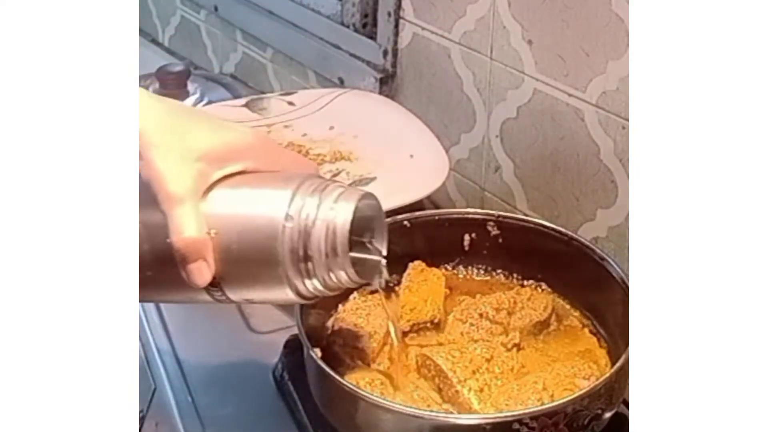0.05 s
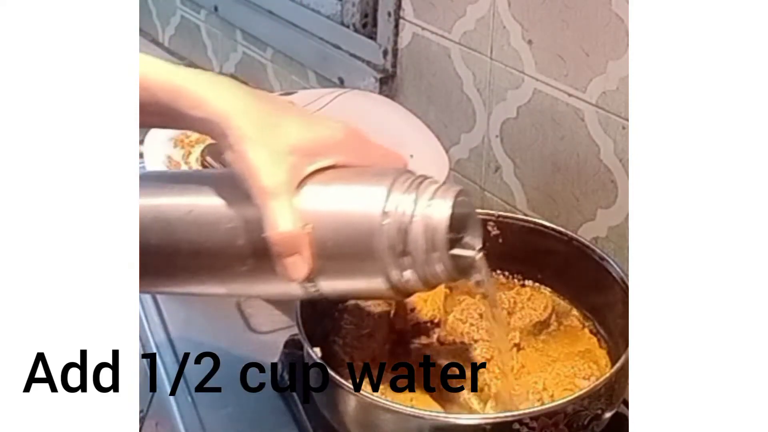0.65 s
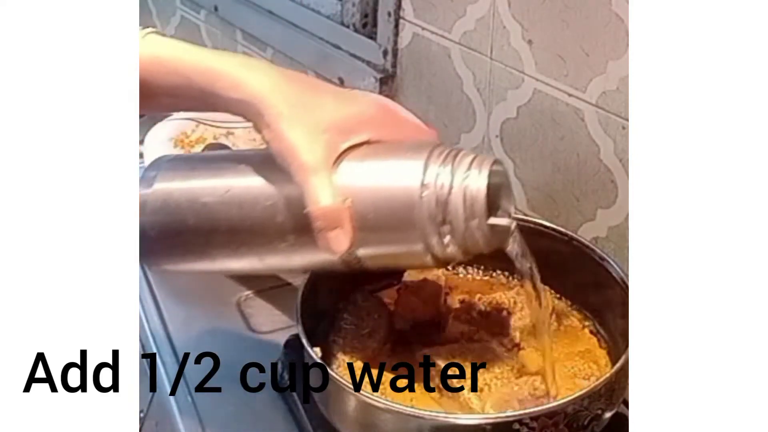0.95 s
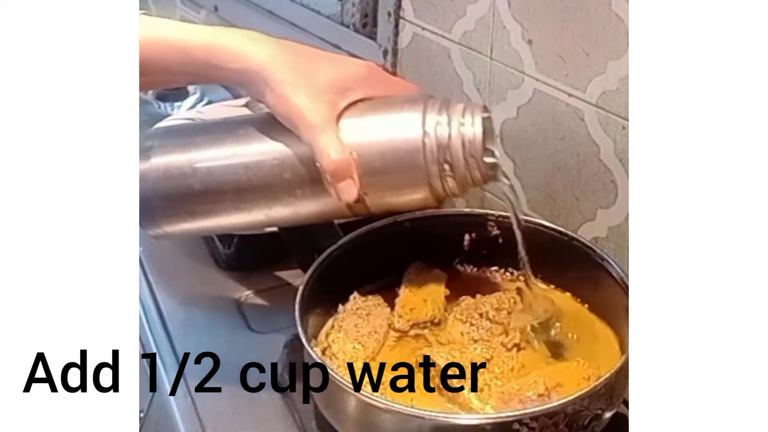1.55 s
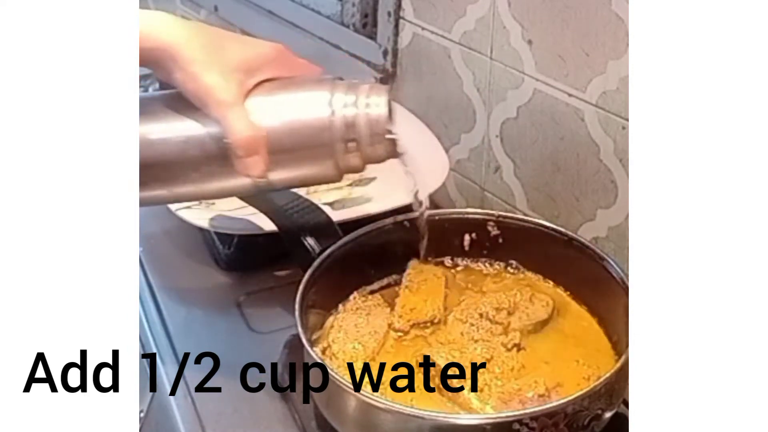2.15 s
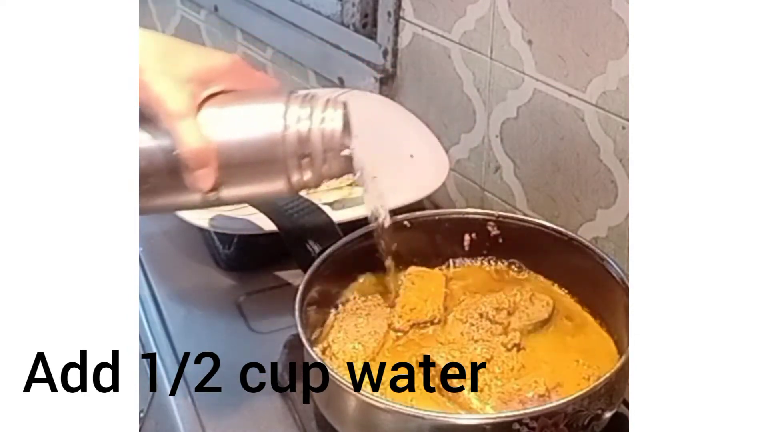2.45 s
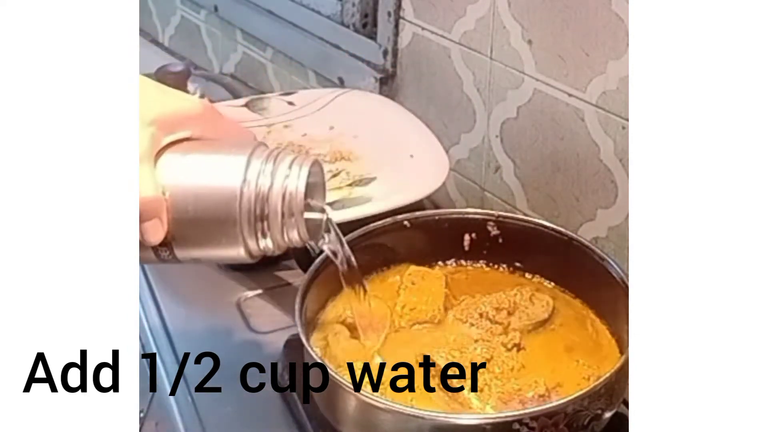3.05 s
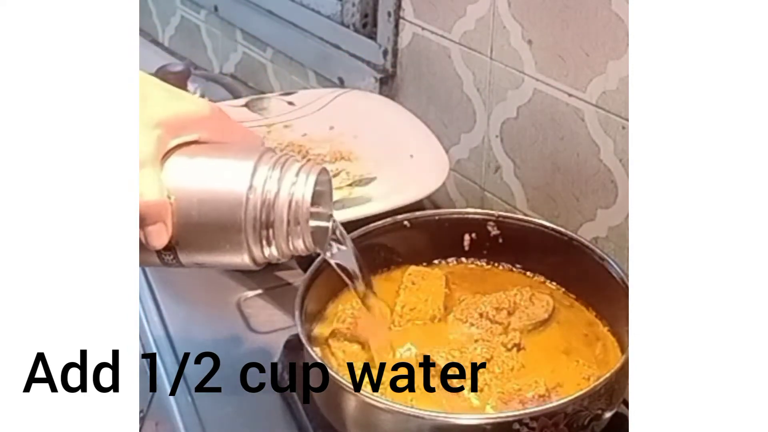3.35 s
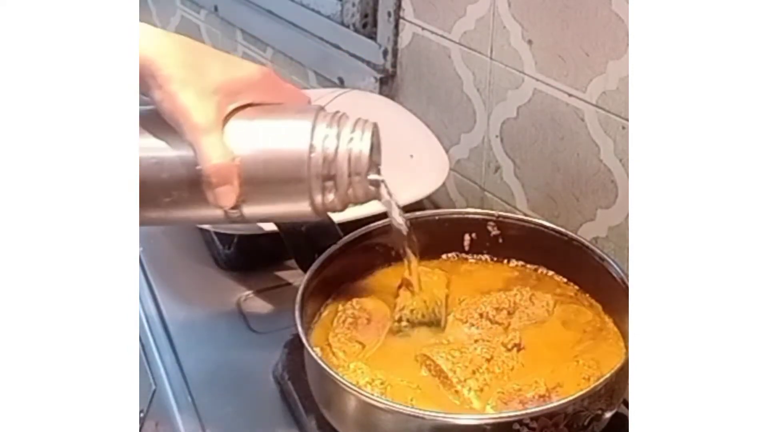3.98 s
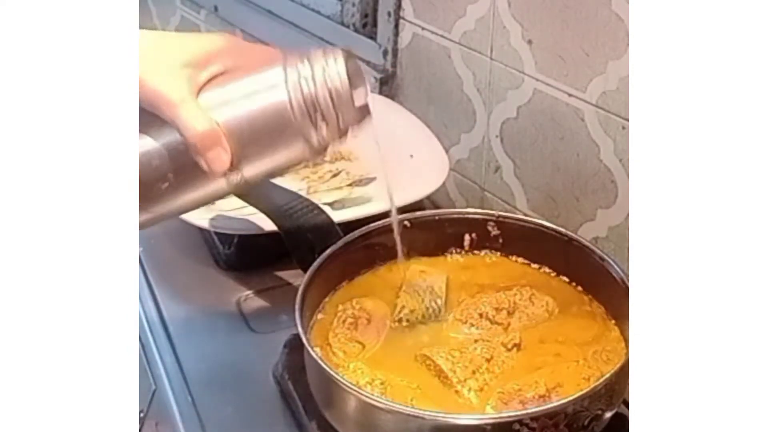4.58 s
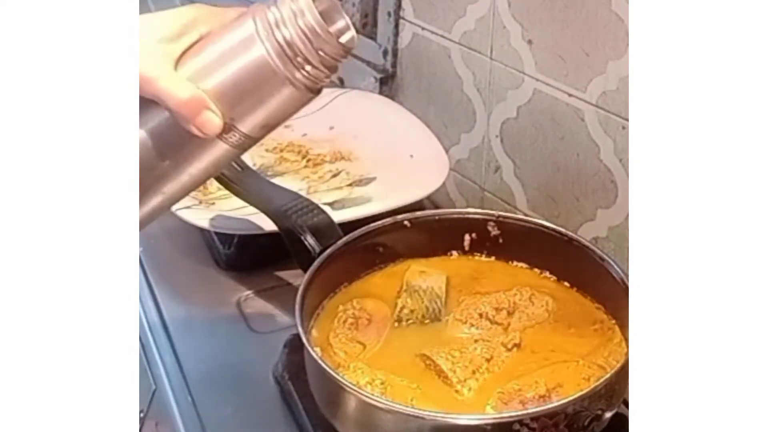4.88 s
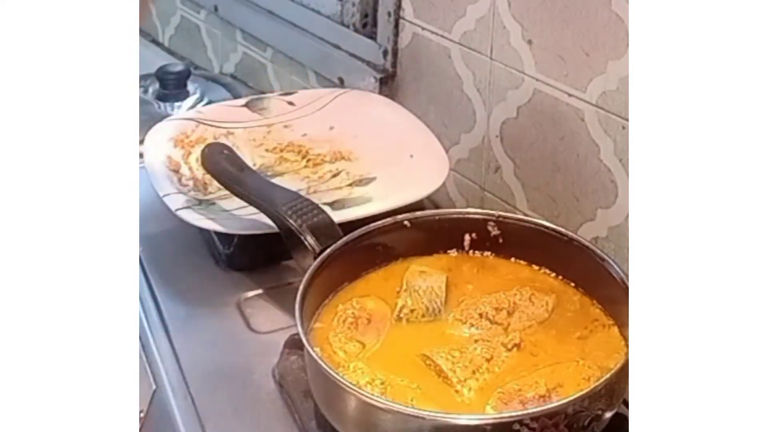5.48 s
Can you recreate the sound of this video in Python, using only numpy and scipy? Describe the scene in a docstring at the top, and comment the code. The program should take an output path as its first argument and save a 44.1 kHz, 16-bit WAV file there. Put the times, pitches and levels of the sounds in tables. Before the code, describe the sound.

Fish fries in a pan with a dense sizzle and sharp spits of fat. Water is poured in, and the sizzle thins to a light crackle with brief flares while the stream splashes, gurgles and plips. As the pouring stops, a steel flask gives one low clunk with a metallic ring. The pan sounds close and slightly to the right, in a small reverberant kitchen with a faint appliance hum.

```python
"""A dense sizzle is heard first: steam bubbles burst around fish frying in oil and spice paste; fat spits.
Water poured from a steel flask cools the pan, so the crackle thins, flaring where a spot is still hot.
The stream splashes and traps air, which rings as bubbles. Tipped upright, the flask clunks:
a short low boom that lingers in the room, with a steel ring above it.
A small tiled kitchen reverberates, over the low hum of an appliance."""
import sys
import numpy as np
from scipy import signal
from scipy.fft import rfft, irfft, next_fast_len
from scipy.io import wavfile

SR = 44100
rng = np.random.default_rng(int(sys.argv[2]) if len(sys.argv) > 2 else 0)


def generate_wav(signal):
    """Clip the signal to [-1, 1] and save it as 16-bit WAV at the path in sys.argv[1]."""
    frames = np.transpose(np.atleast_2d(signal))
    scaled = np.clip(frames, -1, 1) * 32767
    pcm = np.round(scaled).astype(np.int16)
    wavfile.write(sys.argv[1], SR, pcm)


N = 247842

# Event levels are those of the source, before colouring, room and microphone.
# water reaching spots that are still hot: (t/s, length/s, level/dB)
FLARES = [(0.0, 0.27, -53.5), (0.85, 0.23, -51), (2.32, 0.2, -61.5), (3.04, 0.043, -55.5),
          (3.46, 0.25, -58.5), (3.82, 0.17, -58), (4.13, 0.28, -55.5), (4.59, 0.035, -56)]
# spectrum of the froth in hot oil: (f/Hz, level/dB)
FROTH_SPECTRUM = [(300, -39.5), (600, -12.5), (740, 3), (1200, -2.5), (2000, 8), (4500, -3.5), (7500, -0.5),
                  (15000, -1.5)]
# resonances of the pan: (f/Hz, bandwidth/Hz, level/dB relative to the crackle)
PAN_MODES = [(737, 13, 3.5), (903, 25, 0.5), (1166, 83, 5), (1830, 32, -11), (3680, 34, -2.5),
             (4030, 24, -3.5)]
# spectrum of the fine spray: (f/Hz, level/dB)
SPRAY_SPECTRUM = [(5500, -22.5), (8500, -5), (15000, -6)]
# the stream breaking up on the fish into spray: (t/s, length/s, level/dB)
SPLASHES = [(1.38, 0.05, -54), (1.68, 0.25, -53.5), (2.93, 0.11, -58.5), (3.35, 0.074, -59),
            (3.57, 0.597, -54.5), (4.22, 0.19, -56), (4.57, 0.033, -53.5)]
# spectrum of the kitchen air: (f/Hz, level/dB)
AIR_SPECTRUM = [(15, 5.5), (35, -65), (55, -5), (90, -2), (160, -3.5), (300, -11.5), (900, -11),
                (2400, -12.5), (5000, -21), (15000, -22)]
# left-right coherence of that air: (f/Hz, coherence 0-1)
AIR_COHERENCE = [(60, 1), (140, 0.98), (300, 0.71), (700, 0.64), (3000, 0)]
# steady tones: the appliance hum, and at 736 Hz the pan's lowest mode ringing on: (f/Hz, relative level/dB)
HUM_TONES = [(77.5, -11), (148, -9), (296, -9.5), (736, -7)]
# spitting fat: (t/s, level/dB, f/Hz)
SPITS = [(0.126, -27.5, 5450), (0.198, -27, 7100), (0.4347, -26.5, 5150), (0.606, -29.5, 5000),
         (0.629, -32, 4700), (0.857, -30, 6260), (1.0173, -34, 5550), (1.038, -30, 5200),
         (1.063, -32, 4230), (1.0807, -30.5, 5130), (1.331, -37, 4840), (1.429, -35.5, 4740),
         (1.475, -26, 3450), (1.5739, -28.5, 3550), (1.9982, -32.5, 4770), (2.128, -34.5, 3700),
         (2.329, -41.5, 5100), (2.373, -41, 4100), (3.09, -32.5, 4980), (3.5384, -24, 5300),
         (3.9087, -27, 3270), (4.1953, -37.5, 5100), (4.302, -32, 4960), (4.362, -36.5, 5000),
         (4.4665, -43, 5100), (4.981, -42, 5400)]
# thin, bright snaps of spray: (t/s, level/dB)
SNAPS = [(2.8304, -40.5), (3.219, -35), (3.6593, -32), (4.061, -39)]
# loud plips of air bubbles in the poured water: (t/s, level/dB, f/Hz)
PLIPS = [(0.701, -26, 3600), (2.445, -39, 2640), (2.4605, -39, 2430), (2.5026, -38.5, 2770),
         (2.513, -41, 1840), (2.634, -40, 1970), (2.728, -42, 3090), (2.9302, -41.5, 2700),
         (3.0104, -45, 1690), (3.3543, -38, 2930), (3.368, -38, 2790), (3.542, -28, 5070),
         (3.6113, -34.5, 2400), (4.194, -41, 1940), (4.302, -28.5, 4190), (4.387, -36, 1780)]
# gushes from the flask's neck: (t/s, length/s, level/dB, bubble f/Hz)
GUSHES = [(2.184, 0.11, -59, 2310), (2.452, 0.084, -53, 2180), (2.57, 0.16, -62.5, 2590),
          (3.01, 0.085, -60, 2280), (3.258, 0.057, -59.5, 2200), (3.332, 0.19, -59.5, 2840),
          (3.548, 0.24, -55, 2300), (3.854, 0.12, -57.5, 2710), (4.19, 0.2, -55.5, 2304)]
# spectrum of the bubbling gravy: (f/Hz, level/dB)
BUBBLE_SPECTRUM = [(500, -32), (1200, 10.5), (1900, 6), (3000, 12), (5000, 7), (8000, -19)]
# the flask's low boom, the room modes it excites and the steel ring: (f/Hz, relative level/dB, T60/s)
CLUNK_MODES = [(479.4, 17, 0.054), (437, 3.5, 0.34), (458, -3, 0.4), (500, -8, 0.53), (515.6, 2, 0.4),
               (559, -3.5, 0.3), (1588, -17, 0.48), (2454, -12, 0.33), (2850, -18.5, 0.44),
               (4150, -8, 0.12), (5270, 0, 0.092), (5220, -11.5, 0.48)]
# lean of the clunk to the right: (f/Hz, right minus left level/dB)
FLASK_LEAN = [(440, -4), (520, 3.5), (2400, -0.5)]
# reverberation time of the kitchen: (f/Hz, T60/s)
KITCHEN_T60 = [(200, 0.068), (500, 0.77), (2500, 0.29), (5500, 0.41), (14000, 0.11)]
# response of the microphones: (f/Hz, level/dB)
MIC_RESPONSE = [(700, 0.5), (1100, 1), (1320, -3), (1800, 2), (2100, 0), (2600, 4.5), (3500, -2),
                (5080, 5.5), (6600, -0.5), (9700, -13), (11500, -8.5), (15500, -6.5)]
# imbalance of the microphones: (f/Hz, left minus right level/dB)
MIC_BALANCE = [(1200, -0.5), (2400, -1), (4500, -6), (8500, -2.5), (15000, 1.5)]

LEFT_LAG_S = 0.00041  # the pan's sound reaches the left microphone later


def amp(db):
    """Decibels to amplitude ratio."""
    return 10 ** (np.asarray(db) / 20)


def unit(x):
    """Normalisation to rms 1."""
    return x / np.sqrt(np.mean(x ** 2) + 1e-20)


def along(points, hz):
    """Interpolation of (f/Hz, value) points on a logarithmic frequency axis."""
    f, v = np.transpose(points)
    return np.interp(np.log(hz + 1), np.log(f + 1), v)


def since(s):
    """Time elapsed since s, zero before it."""
    return np.maximum(np.arange(N) / SR - s, 0)


def flutter(rate):
    """Random modulation: straight lines through Gaussian knots, rate knots a second."""
    knots = rng.standard_normal(2048)
    return np.interp(np.arange(N) * (rate / SR), np.arange(len(knots)), knots)


def surges(rows, attack_s=0.0046, release_s=0.064):
    """Incoherent sources add in power: the joint envelope of (t/s, length/s, level/dB) events."""
    shape = lambda s, length: np.minimum(since(s) / attack_s, 1) * np.exp(-since(s + length) / release_s)
    return np.sqrt(sum((amp(db) * shape(s, length)) ** 2 for s, length, db in rows))


def add(track, s, sound):
    """Superposition of a sound on a track at time s."""
    part = track[..., max(round(s * SR), 0):][..., :sound.shape[-1]]
    part += sound[..., :part.shape[-1]]


def filtered(x, response):
    """Linear filtering: the spectrum of x times a frequency response."""
    m = next_fast_len(N + SR // 2)
    return irfft(rfft(x, m) * response(np.fft.rfftfreq(m, 1 / SR)), m)[..., :N]


def coloured(x, spectrum, size=2048):
    """A minimum-phase filter is causal, so clicks keep their sharp fronts."""
    cepstrum = irfft(np.log(amp(along(spectrum, np.fft.rfftfreq(size, 1 / SR))) + 1e-6))
    cepstrum[1:size // 2] *= 2
    cepstrum[size // 2 + 1:] = 0
    kernel = irfft(np.exp(rfft(cepstrum)))
    return signal.fftconvolve(x, kernel[None], axes=1)[:, :N]


def swarm(rate, pitch_hz, scatter, cycles, spread_db, count, size):
    """Damped oscillators, few strong and many weak, start at random, rate a second; stereo, rms 1."""
    when, luck, weight, place = rng.random((count, 4)).T
    start = (when * N).astype(int)
    alive = luck < np.broadcast_to(rate, N)[start] * N / SR / count  # thin out the candidates
    start, weight, place = start[alive, None], weight[alive, None], place[alive, None]
    detune, life, lean = rng.standard_normal((count, 3))[alive].T[..., None]
    hz = np.clip(np.broadcast_to(pitch_hz, N)[start] * np.exp(scatter * detune), 200, SR / 3)
    turns = hz * np.arange(size) / SR
    age = turns / (cycles * np.exp(life / 2))
    strength = amp(spread_db * np.minimum(-np.log(weight + 1e-9), 3.5))
    ring = strength * np.exp(-age) * np.sin(2 * np.pi * turns)
    # each has its own place in the pan, so its own delay at the left microphone
    index = start + np.arange(size)
    lag = (place * 0.0002 * SR).astype(int)
    left = np.bincount((index + lag).ravel(), (ring * amp(2 * lean)).ravel(), N)[:N]
    right = np.bincount(index.ravel(), ring.ravel(), N)[:N]
    return unit(np.array([left, right]))


def kitchen(x, right_db, room_db, walls_db, walls_t60, lag_s=0):
    """Direct sound from the right, early reflections from pan rim and tiles, then reverberation."""
    hz, t, noise = signal.stft(rng.standard_normal((2, SR // 2)), SR, nperseg=256)
    tail = signal.istft(noise * amp(-60 * t / along(KITCHEN_T60, hz)[:, None]), SR, nperseg=256)[1]
    t = np.arange(tail.shape[1]) / SR
    tail *= 1 - np.exp(-t / 0.0013)
    walls = rng.standard_normal(tail.shape) ** 3 * amp(-60 * t / walls_t60) * (t > 0.001)
    norm = lambda h: h / np.linalg.norm(h, axis=1, keepdims=True)
    reflections = amp(room_db) * norm(tail) + amp(walls_db) * norm(walls)
    direct = np.array([np.pad(x[0], (round(lag_s * SR), 0))[:N], x[1]])
    direct *= amp([[-right_db / 2], [right_db / 2]])
    return direct + signal.fftconvolve(x, reflections, axes=1)[:, :N]


def pan_resonance(f):
    """Forced vibration: each mode of the pan adds a narrow band to the sound that drives it."""
    return 1 + sum(amp(db) * 1j * f * width / (hz * hz - f * f + 1j * f * width)
                   for hz, width, db in PAN_MODES)


def sizzle(pour_end_s, hot_db=-48, ticking_db=-67, quench_s=1.05, cooling_db_per_s=8):
    """Boiling: steam bubbles burst as a dense froth in hot oil, as separate ticks once water cools it."""
    oil = np.hypot(amp(hot_db - cooling_db_per_s * since(quench_s)), amp(ticking_db))
    strength = np.hypot(oil, surges(FLARES))
    rate = 90 + 1500 * (strength / amp(hot_db)) ** 1.2
    bursts = swarm(rate, pitch_hz=4900, scatter=0.23, cycles=2.6, spread_db=3.4, count=20000, size=160)
    froth = rng.standard_normal(N) + 1.8 * rng.standard_normal((2, N))
    froth *= amp(1.2 * rng.standard_normal(N))
    froth_share = np.interp(since(0), [1.2, 2.4], [0.7, 0.5]) * (oil / strength) ** 2
    crackle = np.sqrt(froth_share) * unit(coloured(froth, FROTH_SPECTRUM))
    crackle += np.sqrt(1 - froth_share) * unit(bursts / np.sqrt(rate))
    clumps = amp(2 * flutter(110))
    frying = strength * clumps * filtered(crackle, pan_resonance)
    # the hottest oil also cracks in sharp ticks
    thinning_db = 4 * since(0)
    ticks = swarm(220, pitch_hz=7000, scatter=0.2, cycles=1.8, spread_db=4, count=2000, size=96)
    frying += oil * amp(-6.5 - thinning_db) * ticks
    frying += spray(level_db=-51.5 - thinning_db - 21 * since(pour_end_s))
    return kitchen(frying, right_db=4, room_db=-7, walls_db=-5, walls_t60=0.025, lag_s=LEFT_LAG_S)


def spray(level_db):
    """Atomisation: the finest droplets fly off in spurts, louder where the stream breaks on the fish."""
    mist = swarm(1100, pitch_hz=11500, scatter=0.28, cycles=2.3, spread_db=2, count=10000, size=48)
    spurts = amp(3 * flutter(45))
    return np.hypot(amp(level_db), surges(SPLASHES)) * spurts * unit(coloured(mist, SPRAY_SPECTRUM))


def room_air():
    """A diffuse noise field is coherent between left and right in the bass, less so higher up."""
    angle = lambda hz: np.arccos(np.clip(along(AIR_COHERENCE, hz), -1, 1)) / 2
    shape = lambda hz: amp(along(AIR_SPECTRUM, hz)) * np.array([np.cos(angle(hz)), np.sin(angle(hz))])
    mid, side = filtered(rng.standard_normal((2, N)), shape)
    return amp(-55) * unit(np.array([mid + side, mid - side]))


def appliance_hum():
    """A line spectrum with random phase modulation; the lowest tone swells near the end."""
    lowest, *others = [amp(db) * np.sqrt(2) * np.sin(2 * np.pi * hz * since(0) + 1.94 * flutter(4.1))
                       for hz, db in HUM_TONES]
    swell = surges([(5.34, 0.3, -52.5)])
    return (amp(-60.5) + swell) * lowest + amp(-69.5) * sum(others)


def spitting():
    """Short impulses have broad spectra: fat spits with a crack, and spray snaps high above it."""
    spits, snaps = np.zeros((2, 2, N))
    t = np.arange(SR // 20) / SR
    for s, db, hz in SPITS:
        ring = np.sin(2 * np.pi * hz * t) * amp(-60 * t / 0.005)
        crack = rng.standard_normal(len(t)) * amp(-60 * t / 0.017)
        add(spits, s, amp(db) * (0.85 * ring + 0.42 * crack) * (1 - np.exp(-t / 0.00025)))
    for s, db in SNAPS:
        add(snaps, s, amp(db) * rng.standard_normal((2, len(t))) * amp(-60 * t / 0.018))
    track = coloured(spits, [(400, -32), (2000, 3), (5500, 3.5), (9000, -5.5), (15000, -26)])
    track += coloured(snaps, [(2000, -17), (5000, -15), (9000, -7.5), (14000, 5.5)])
    return kitchen(track, right_db=8, room_db=-6, walls_db=-1, walls_t60=0.04, lag_s=LEFT_LAG_S)


def bubble_plips(t60_cycles=42, rise_per_s=3, scatter=0.14, spread_s=0.018, splinter_db=-9):
    """Bubble resonance: a loud plip and four weaker ones, each rising in pitch as it surfaces."""
    track, t = np.zeros((2, N)), np.arange(SR // 20) / SR
    attack = 1 - np.exp(-t / 0.0004)
    glide = 1 + rise_per_s * t / 2
    bubble = lambda hz: np.sin(2 * np.pi * hz * t * glide) * amp(-60 * t * hz / t60_cycles) * attack
    for s, db, hz in PLIPS:
        add(track, s, amp(db) * bubble(hz))
        for late, detune in zip(rng.random(4), rng.standard_normal(4)):
            add(track, s + spread_s * late, amp(db + splinter_db) * bubble(hz * np.exp(scatter * detune)))
    return kitchen(track, right_db=5, room_db=-5, walls_db=-3, walls_t60=0.05)


def pouring(pool_s, end_s, trickle_db=-66, patter_db=-11.5):
    """Air entrainment: once a pool has formed, each gush drives in bubbles of its own size and pitch."""
    s, length, db, hz = np.transpose(GUSHES)
    pitch = np.interp(since(0), s + length / 2, hz)
    bubbles = swarm(480, pitch_hz=pitch, scatter=0.17, cycles=5.3, spread_db=1.8, count=3500, size=700)
    drops = swarm(360, pitch_hz=1700, scatter=0.38, cycles=2.2, spread_db=2.2, count=3500, size=700)
    flow = surges([(pool_s, end_s - pool_s, trickle_db), *zip(s, length, db)])
    slap = surges([(4.19, 0.2, -55.5)])  # the stream lands on a piece of fish
    fizz = surges([(5.29, 0.13, -62.5)])  # the gravy fizzes up once more
    water = flow * unit(coloured(bubbles, BUBBLE_SPECTRUM))
    water += np.hypot(slap, amp(patter_db) * flow) * coloured(drops, [(400, -20), (950, 0)])
    water += fizz * unit(coloured(rng.standard_normal((2, N)), BUBBLE_SPECTRUM))
    return kitchen(water, right_db=3, room_db=-6, walls_db=-4, walls_t60=0.03)


def flask_clunk(s, ring_db, crack_db):
    """Impact excites damped modes: a short low boom that lingers in the room, a steel ring above it."""
    t = np.arange(SR * 3 // 4) / SR
    # fast phase flutter widens the highest modes into a rough, bright metallic ring
    waver = lambda hz: (hz / 2100) ** 1.3 * flutter(280)[:len(t)]
    ring = sum(amp(db - 60 * t / t60) * np.sin(2 * np.pi * hz * t + waver(hz))
               for hz, db, t60 in CLUNK_MODES)
    ring *= 1 - np.exp(-(t / 0.0043) ** 2)
    # so small a body radiates little bass
    ring = signal.sosfilt(signal.butter(4, 350, "high", fs=SR, output="sos"), ring)
    burst = rng.standard_normal(len(t)) * amp(-60 * t / 0.2) * (1 - np.exp(-t / 0.002))
    track, crack = np.zeros((2, 2, N))
    add(track, s, amp(ring_db) * ring)
    add(crack, s, amp(crack_db) * burst)
    track += coloured(crack, [(300, -39), (480, 13), (660, -7.5), (1050, -13), (1900, -24), (2700, -11.5),
                              (3500, -9), (4200, -23), (5000, -8.5), (7000, -13.5), (15000, -15)])
    clunk = kitchen(track, right_db=4, room_db=-12, walls_db=-10, walls_t60=0.05, lag_s=LEFT_LAG_S)
    return filtered(clunk, lambda hz: amp([-along(FLASK_LEAN, hz) / 2, along(FLASK_LEAN, hz) / 2]))


def scene():
    """Superposition: the pressures from pan, room, stream and flask add."""
    pour_end_s = 4.57
    return (sizzle(pour_end_s) + room_air() + appliance_hum() + spitting() + bubble_plips()
            + pouring(pool_s=2.1, end_s=pour_end_s) + flask_clunk(s=4.7135, ring_db=-30.5, crack_db=-20.5))


def record(dry, top_hz=15850):
    """The microphone ports resonate in the treble, the left one less; nothing passes above top_hz."""
    balance = lambda hz: amp([along(MIC_BALANCE, hz) / 2, -along(MIC_BALANCE, hz) / 2])
    return filtered(coloured(dry, MIC_RESPONSE), lambda hz: balance(hz) * (hz < top_hz))


dry = scene()
out = record(dry)
generate_wav(out)
```